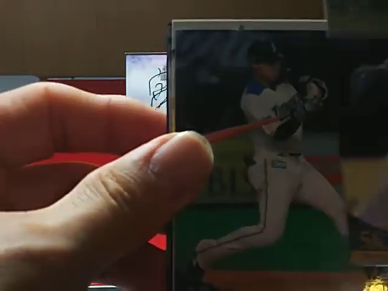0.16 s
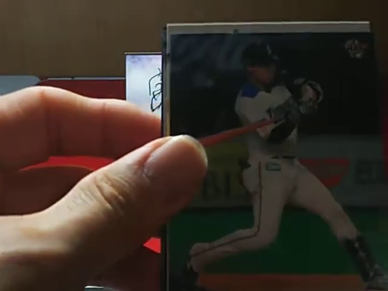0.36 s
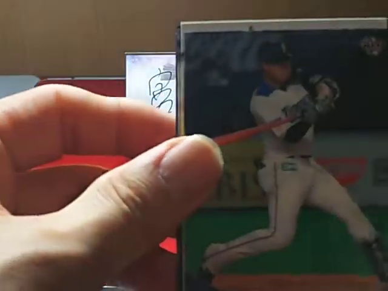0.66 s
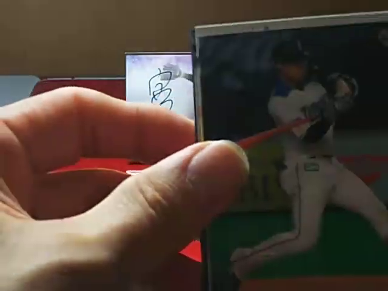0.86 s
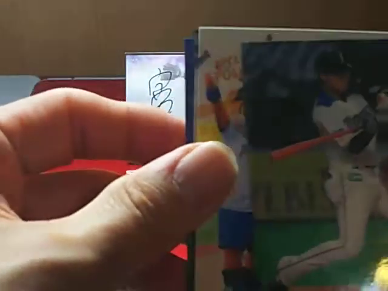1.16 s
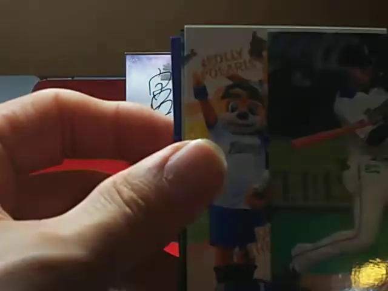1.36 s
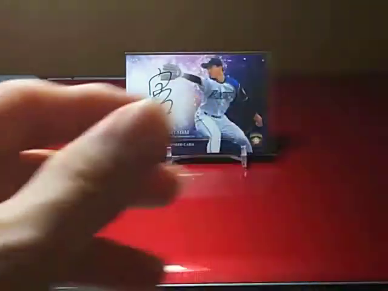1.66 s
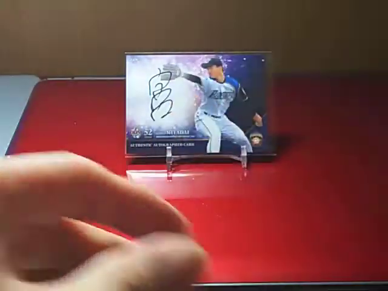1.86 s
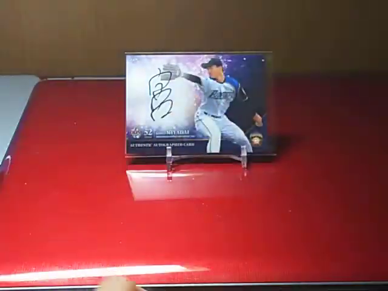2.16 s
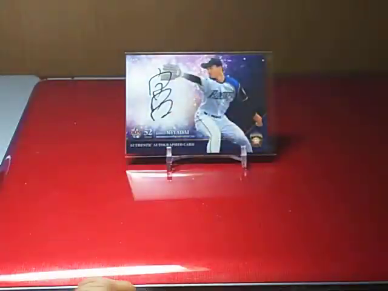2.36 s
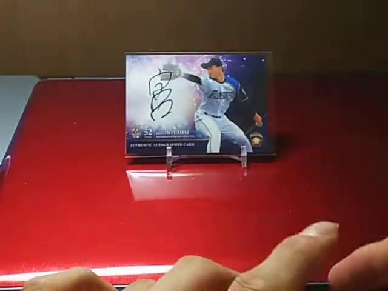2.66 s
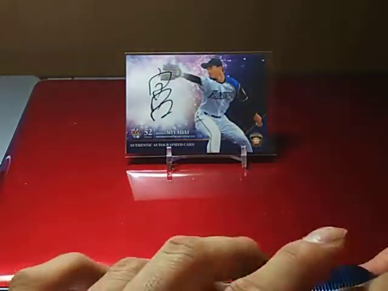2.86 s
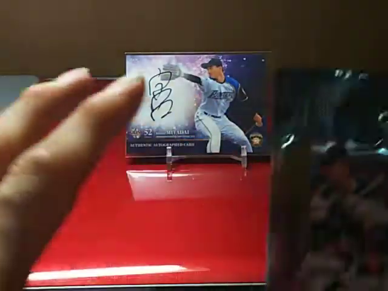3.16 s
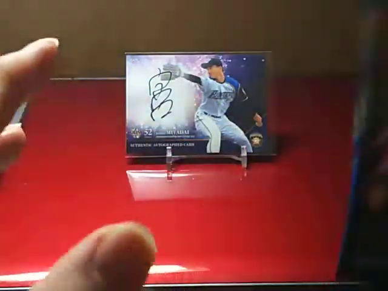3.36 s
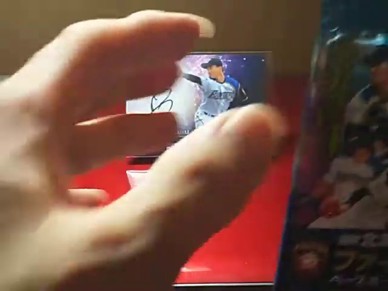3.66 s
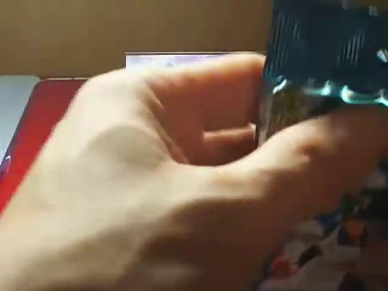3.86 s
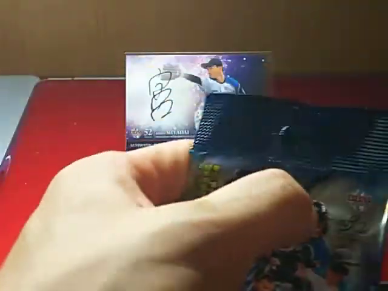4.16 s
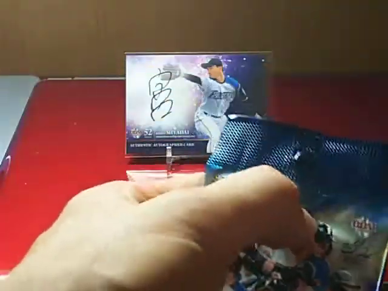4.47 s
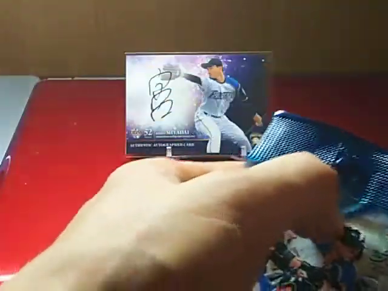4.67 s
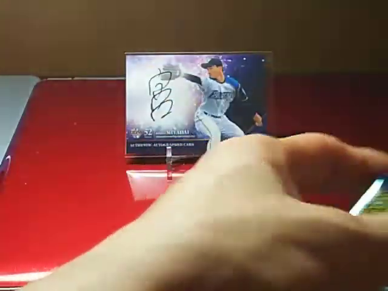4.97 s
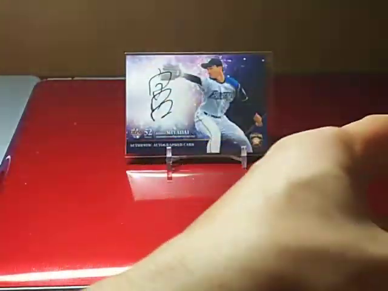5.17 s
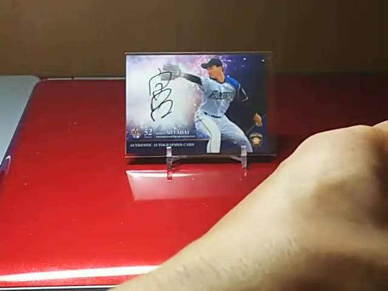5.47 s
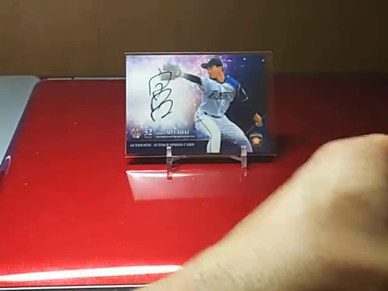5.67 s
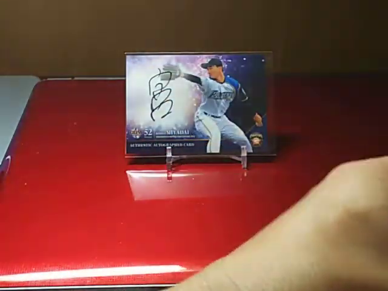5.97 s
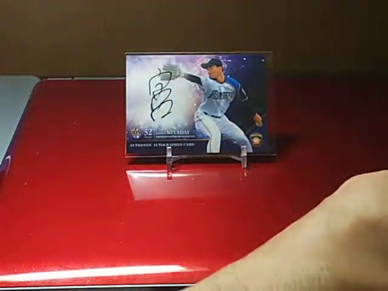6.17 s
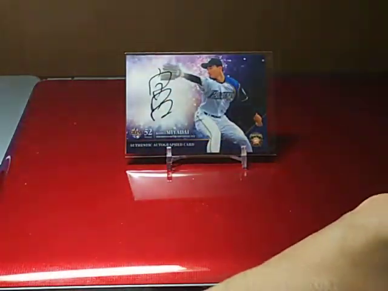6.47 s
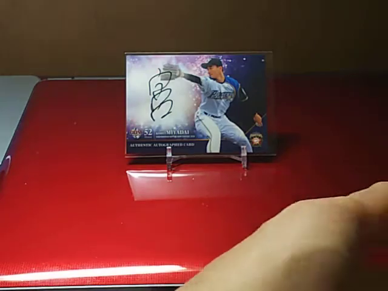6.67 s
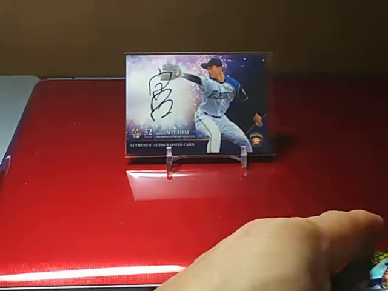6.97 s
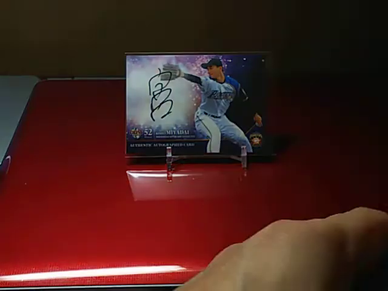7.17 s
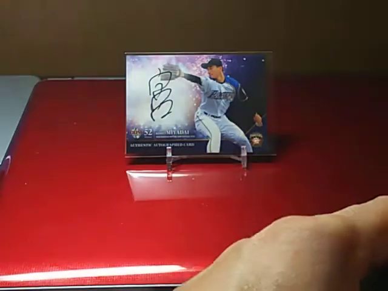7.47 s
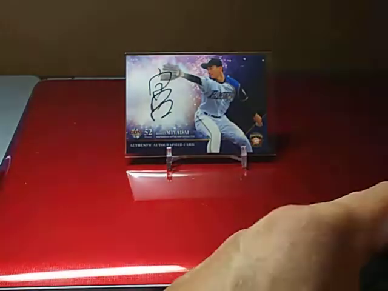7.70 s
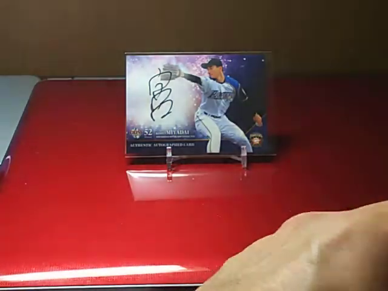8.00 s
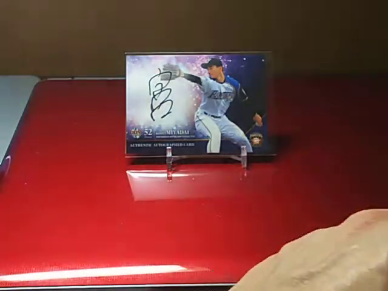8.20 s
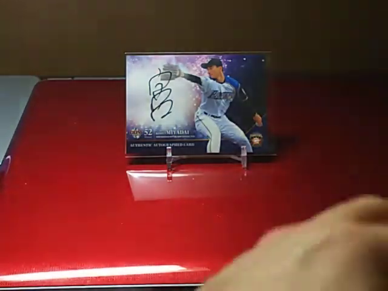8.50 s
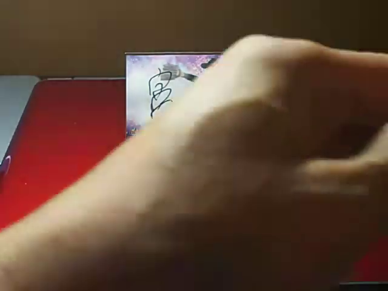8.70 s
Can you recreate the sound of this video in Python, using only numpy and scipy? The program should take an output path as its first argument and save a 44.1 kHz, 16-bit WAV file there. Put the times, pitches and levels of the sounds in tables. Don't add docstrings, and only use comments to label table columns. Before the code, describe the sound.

Cards shift faintly in a quiet humming room, then a foil pack crackles, is pried at and ripped open with sharp close snaps and table knocks.

```python
import sys
import numpy as np
from scipy import signal
from scipy.fft import rfft, irfft, next_fast_len
from scipy.io import wavfile
from scipy.ndimage import uniform_filter1d, minimum_filter1d

SR = 44100
rng = np.random.default_rng(int(sys.argv[2]) if len(sys.argv) > 2 else 0)


def amp(db):
    return 10 ** (np.asarray(db, float) / 20)


def write(x):
    x = np.atleast_2d(x).T
    wavfile.write(sys.argv[1], SR, np.round(np.clip(x, -1, 1) * 32767).astype(np.int16))


N = 389868

# (frequency [Hz], level [dB per Hz])
AIR_COLOUR = [(15, -42.5), (25, -27.5), (47, -9), (91, -6.5), (123, -7), (146, -15), (308, -18), (436, -22),
              (532, -20.5), (649, -27), (1840, -27), (2030, -27), (9500, -37), (12400, -108), (20900, -120)]
# (frequency [Hz], likeness [0 to 1])
AIR_LIKENESS = [(60, 0.99), (170, 0.92), (460, 0.59), (1280, 0.087), (3540, 0.0081), (9800, 0.02)]
# (frequency [Hz], width [Hz], level [dB], left-right [dB])
HUM_LINES = [(62, 7.2, -64, -3), (95, 4.1, -77, 0.5), (122.7, 7.9, -61.5, -0.5), (356.2, 22, -71, 0.5),
             (527.2, 14, -70, -5.5)]
# (start [s], end [s], level at start [dB], level at end [dB])
RUSTLE_STROKES = [(0.0, 0.075, -59.5, -59.5), (0.1, 0.301, -72.5, -71), (0.32, 0.351, -63.5, -66.5),
                  (0.857, 0.903, -67.5, -67), (1.507, 1.538, -58.5, -72.5), (1.88, 2.068, -72, -56),
                  (2.068, 2.102, -57.5, -62), (2.211, 2.287, -58, -56), (2.342, 2.447, -54, -57),
                  (2.464, 2.47, -43, -35.5), (2.593, 2.657, -53.5, -52.5), (2.806, 2.843, -31.5, -39.5),
                  (2.954, 3.012, -34, -35), (3.226, 3.275, -53.5, -48.5), (3.296, 3.392, -55, -48),
                  (3.963, 3.981, -44, -50), (4.222, 4.296, -59, -47), (4.399, 4.487, -43, -61.5),
                  (4.632, 4.674, -26.5, -36.5), (4.925, 4.967, -49, -52), (5.167, 5.402, -47, -61),
                  (5.494, 5.577, -53.5, -32), (5.571, 5.589, -25, -38), (5.69, 5.768, -51, -34),
                   (5.823, 5.884, -31.5, -34.5), (6.007, 6.097, -41.5, -44), (6.135, 6.205, -46, -41),
                   (6.34, 6.437, -51.5, -36), (6.571, 6.674, -60.5, -54), (6.814, 6.904, -61, -57),
                   (6.944, 7.007, -31, -35.5), (7.022, 7.054, -53, -44), (7.389, 7.458, -44, -30),
                   (7.584, 7.597, -39, -35.5), (7.621, 7.686, -25, -23.5), (7.846, 7.955, -36, -35.5),
                   (8.075, 8.199, -44, -40), (8.235, 8.294, -49.5, -38), (8.297, 8.379, -37.5, -43),
                   (8.392, 8.466, -43, -56), (8.561, 8.636, -49.5, -60)]
# (start [s], length [s], level [dB], pitch [Hz])
CARD_SQUEAK = (0.04, 0.03, -64, 1085)
# (start [s], length [s], level [dB], pitch [Hz])
HELD_RINGS = [(0.298, 0.0049, -52, 418), (0.348, 0.004, -61, 920), (2.8005, 0.003, -26, 1250),
              (2.951, 0.0036, -36.5, 930), (4.408, 0.006, -47, 444), (4.423, 0.005, -53, 470),
              (4.471, 0.0063, -43.5, 330), (6.899, 0.023, -31.5, 228.6), (6.925, 0.025, -44.5, 420),
              (6.906, 0.024, -34, 323), (6.956, 0.03, -31, 476), (6.976, 0.023, -39, 315),
              (6.975, 0.023, -40, 137), (7.655, 0.022, -38, 325), (6.06, 0.025, -49, 1740)]
# (time [s], peak level [dB], quarter of the hand's damping time to fall 60 dB [s],
# favoured pitch [Hz])
TABLE_KNOCKS = [(0.323, -43.5, 0.087, 223), (0.718, -42, 0.065, 102), (2.049, -37.5, 0.063, 158),
                (2.799, -33.5, 0.043, 774), (2.951, -23.5, 0.01, 714), (4.407, -31.5, 0.033, 228),
                (4.43, -30, 0.021, 127), (4.47, -38, 0.092, 290), (4.483, -34, 0.1, 256),
                (4.631, -30, 0.22, 646), (4.637, -32, 0.2, 239), (5.844, -37.5, 0.075, 204),
                (6.443, -35, 0.011, 200), (5.57, -37.5, 0.11, 473), (5.832, -39, 0.034, 800),
                (6.429, -31, 0.06, 750), (6.899, -29.5, 0.026, 450), (6.905, -33.5, 0.04, 720),
                (4.449, -50.5, 0.015, 444), (6.913, -23, 0.088, 246), (6.955, -28, 0.065, 251),
                (6.974, -31.5, 0.09, 460), (7.033, -31, 0.06, 247), (7.43, -31, 0.027, 118),
                (7.646, -43, 0.023, 345), (7.66, -33.5, 0.24, 350), (7.884, -28, 0.0077, 501),
                (7.908, -29.5, 0.03, 493), (8.134, -28.5, 0.013, 700)]
# (frequency [Hz], width [Hz], level [dB])
TABLE_MODES = [(144, 47, -2), (235, 18, -4.5), (312, 50, 1), (464, 27, -4), (736, 43, -6.5),
               (948, 30, -0.5)]
# (time [s], level [dB])
SMALL_TICKS = [(0.326, -38), (0.748, -52.5), (2.227, -44), (2.373, -43), (2.446, -28), (2.619, -38),
               (2.787, -43), (2.942, -26), (3.045, -39.5), (3.096, -39), (3.18, -38.5), (3.795, -38),
               (3.913, -43.5), (3.93, -38), (4.243, -49), (4.258, -40), (4.404, -31.5), (4.471, -38),
               (4.837, -41), (4.89, -44), (5.857, -24), (6.068, -38), (6.079, -27.5), (6.298, -32),
               (6.363, -32), (7.392, -40), (7.511, -39), (8.229, -54), (8.573, -33.5), (8.581, -38)]
# (time [s], level [dB], body re level [dB], edge
# re level [dB])
BIG_CREASES = [(0.724, -44, 0, -4), (2.053, -22, -14, -20), (2.239, -25, -25, -15),
               (2.264, -30, -21.5, -8), (2.394, -32, -24, -10.5), (2.419, -10, -50, -11.5),
               (2.431, -9, -44, -10), (2.519, -19, -19, -9.5), (2.664, -26.5, -18, -9),
               (2.728, -23, -12.5, -11.5), (2.802, -28.5, 4.5, -2.5), (2.829, -33, 2, -6),
               (2.952, -24, 1, -4), (2.986, -17, -36, -8), (2.995, -14.5, -27, -13),
               (3.035, -18, -28, -15), (3.209, -29, -20.5, 2.5), (3.259, -26, -24, -5.5),
               (3.349, -33.5, -20, 4.5), (3.544, -19, -13, -10.5), (3.918, -18, -14, -8.5),
               (3.966, -24, -20, -13), (4.0165, -17, -15, -11), (4.079, -30.5, -19.5, -24),
               (4.288, -28.5, -6.5, 1.5), (4.439, -32.5, -13.5, -27), (4.583, -37, -23, 4),
               (4.631, -24, 0, -10), (4.899, -17, -16, -12.5), (5.064, -39, -3, -4.5),
               (5.514, -48, -25, 8), (5.561, -22, -19, -40), (5.571, -17, -17.5, -19),
               (5.576, -11, -23, -24), (5.702, -34, -1, -11), (5.752, -28, -26, -8), (5.822, -19, -19, -28),
               (5.83, -20, -19, -25), (5.841, -16, -8, -6), (6.01, -47, 5.5, -28), (6.107, -38.5, -3.5, -1),
               (6.152, -25, -18.5, -10), (6.172, -28, 0, -4.5), (6.238, -27.5, -23, 0.5),
               (6.291, -30.5, -4, -10), (6.376, -30, -10, -15), (6.429, -25.5, -8, -20),
               (6.441, -21, -18.5, -4.5), (6.455, -12, -26, -12), (6.539, -22, -26, -17),
               (6.713, -17.5, -28, -1), (6.722, -32, -22, -2), (6.901, -27, -7, -13.5),
               (6.95, -17, -34, -36), (6.962, -29.5, 0, -57.5), (7.037, -36.5, -7, -6),
               (7.2, -18.5, -17, -6), (7.408, -27, -16, -9.5), (7.418, -27, -6, 2),
                (7.432, -13.5, -13, -10), (7.457, -20, -9.5, -5), (7.578, -28, -24, -2.5),
                (7.619, -19, -25, -0.5), (7.642, -14.5, -18.5, -4), (7.66, -5, -27.5, -13),
                (7.843, -16, -21.5, -39), (7.851, -28.5, -10, -18.5), (7.861, -20.5, -36, -13),
                (7.871, -12, -36, -14.5), (7.885, -4, -16.5, -6.5), (7.909, -8, -24, -11),
                (7.927, -20.5, -27, -41), (7.943, -23, -14, -1), (8.138, -18, -23, -23),
                (8.168, -10.5, -17, -23), (8.21, -14.5, -20, -12.5), (8.294, -19, -14.5, -10.5),
                (8.33, -30, -24.5, -18.5)]
# (time [s], level [dB])
CRACKLE_CREASES = [(2.528, -39), (5.522, -41), (5.72, -37), (5.748, -24), (5.759, -31), (5.834, -29),
                   (5.868, -27.5), (6.162, -35), (6.175, -28), (6.198, -33.5), (6.246, -42), (6.434, -31),
                   (6.911, -37), (6.967, -18), (6.973, -24.5), (6.991, -26.5), (7.21, -32), (7.428, -24.5),
                   (7.442, -24.5), (7.587, -38), (7.636, -24), (7.647, -14), (7.671, -15.5), (7.71, -35.5),
                   (7.837, -27.5), (7.889, -16), (7.907, -18), (7.917, -22.5), (7.923, -25), (7.936, -22),
                   (8.135, -20.5), (8.143, -29.5), (8.15, -33), (8.161, -26.5), (8.291, -23.5),
                   (8.297, -26), (8.317, -38), (8.348, -33), (8.364, -40), (0.742, -36), (2.062, -44.5),
                   (3.913, -40), (4.594, -43), (5.036, -48), (5.375, -47.5), (5.551, -41), (5.595, -35.5),
                   (5.735, -45), (5.778, -40), (5.786, -39), (6.18, -37.5), (6.37, -39), (6.917, -31.5),
                   (7.029, -43.5), (7.733, -43.5), (8.099, -44), (8.13, -33.5), (8.201, -37), (8.303, -34)]
# (time [s], level [dB], body re level [dB], edge re level [dB])
QUICK_FOLDS = [(2.513, -36, -20, -16), (2.787, -47, -25, 10), (2.809, -34, -12, -0.5),
               (3.006, -26, -22, -14), (3.957, -39, -20, -16), (4.283, -46, 5, -10), (5.583, -27, -21, -21),
               (5.758, -38, -8, 4.5), (6.068, -36, -14, -14), (6.153, -27, -22, -17), (6.416, -46, -14, 2),
               (6.962, -42, -9, 8), (6.985, -44, 5, -14), (7.037, -35, -14, -10), (7.417, -36, 4, -12),
               (7.628, -25, -7, -5), (7.632, -19, -17, -15), (7.651, -22, -18, -4), (7.667, -20, -24, -14),
               (7.734, -33, -20.5, -15.5), (7.849, -38, -6, 2), (7.873, -28, -0.5, -14),
               (7.909, -11.5, -16, -10), (8.135, -32.5, 2.5, -20), (8.161, -25, -24, -22),
               (7.644, -13, -7, -12), (6.442, -19, -24, -4), (5.833, -20, -26, -10), (7.2, -36, -30, 10),
               (3.919, -39, 0, 8)]
# (time [s], left-right [dB])
HAND_PLACES = [(0, -3.5), (2.3, -8.5), (2.8, -6), (3.6, -5.5), (4.3, -7.5), (5.5, -6.5), (6.1, -8),
               (6.9, -10.5), (7.3, -6.5), (7.64, -10), (7.9, -8), (8.8, -13.5)]
# (start [s], length [s], level [dB], pitch [Hz])
PANEL_POPS = [(2.429, 0.0037, -32.5, 2541), (2.727, 0.0046, -34.5, 2650), (2.802, 0.0037, -40.5, 388),
              (2.827, 0.004, -36.5, 1433), (2.982, 0.011, -38, 2890), (2.993, 0.0043, -35, 1590),
              (3.543, 0.0015, -33, 2106), (3.543, 0.0035, -35.5, 2794), (4.63, 0.0038, -42, 1920),
              (4.631, 0.0035, -27.5, 2676), (4.632, 0.0042, -39, 1406), (4.641, 0.021, -40.5, 1680),
              (4.643, 0.008, -29.5, 2553), (5.56, 0.004, -38, 2920), (5.56, 0.0034, -36.5, 1836),
              (5.571, 0.0046, -32, 1756), (5.838, 0.0048, -31, 1593), (5.86, 0.019, -40.5, 1666),
              (6.169, 0.003, -35.5, 2410), (6.169, 0.0042, -33.5, 1606), (6.171, 0.0033, -36, 1173),
              (6.29, 0.0044, -37.5, 1100), (6.425, 0.0051, -41.5, 820), (6.445, 0.0032, -38, 894),
              (6.903, 0.02, -38, 724), (7.432, 0.005, -38.5, 1663), (7.456, 0.003, -40, 2036),
              (7.639, 0.0067, -24.5, 2620), (7.641, 0.005, -25, 1653), (7.658, 0.0087, -37.5, 898),
              (7.87, 0.0049, -33, 2300), (7.885, 0.0033, -29.5, 572), (7.885, 0.0052, -25, 1924),
              (7.906, 0.0038, -27, 1673), (7.908, 0.004, -26, 2530), (7.912, 0.027, -45.5, 2760),
              (7.943, 0.0029, -43.5, 1100), (7.943, 0.0036, -36, 1783)]
# (start [s], length [s], level [dB], pitch [Hz])
SNAP_PINGS = [(6.4415, 0.00091, -19, 4300), (6.454, 0.002, -20, 3900), (7.432, 0.003, -23, 3800),
              (7.641, 0.006, -12, 3700), (7.643, 0.004, -14.5, 4250), (7.644, 0.0033, -16.5, 3000),
              (7.66, 0.003, -17, 3850), (7.907, 0.004, -12, 4150), (7.909, 0.002, -16, 3500),
              (8.137, 0.003, -22, 3900), (8.2095, 0.0018, -19, 3900)]
# (frequency [Hz], time to fall 60 dB [s])
WALL_DECAY = [(200, 0.16), (2000, 0.2), (10000, 0.15)]
# (frequency [Hz], gain [dB])
LEFT_PORT = [(300, -6), (1500, 2), (2600, 7.5), (3300, 6.5), (3900, 1.5), (4300, 7.5), (4900, 6), (7000, 2),
             (9500, -1.5), (10400, -20.5), (11500, -52.5)]
# (frequency [Hz], gain [dB])
RIGHT_PORT = [(300, -1), (1500, 8), (2400, 9.5), (3200, 16.5), (3800, 27), (4200, 23), (4900, 11),
              (7000, -3), (9000, -11.5), (10400, -29.5), (11500, -56)]
# (frequency [Hz], level [dB])
WEAKEST_KEPT = [(1000, -100), (3000, -88), (7500, -78), (8400, -61.5), (10000, -59), (11000, -47)]


def unit(x):
    return x / np.sqrt(np.mean(x ** 2) + 1e-20)


def along(points, hz):
    f, v = np.transpose(points)
    return np.interp(np.log(hz + 1), np.log(f + 1), v)


def filtered(x, response):
    m = 2 * next_fast_len(N // 2 + SR // 4)
    return irfft(rfft(x, m) * response(np.fft.rfftfreq(m, 1 / SR)), m)[..., :N]


def causal(points):
    def response(hz):
        cepstrum = irfft(np.log(amp(along(points, hz))))
        cepstrum[1:len(hz) - 1] *= 2
        cepstrum[len(hz):] = 0
        return np.exp(rfft(cepstrum))
    return response


def air():
    def mid_side_gain(hz):
        turn = np.arccos(np.clip(along(AIR_LIKENESS, hz), -1, 1)) / 2
        return amp(along(AIR_COLOUR, hz)) * [np.cos(turn), np.sin(turn)]

    def hum_gain(f):
        total = 0
        for hz, width, db, pan_db in HUM_LINES:
            sides = amp(db + np.array([[.5], [-.5]]) * pan_db)
            total = total + sides * np.exp(-((f - hz) / width) ** 2) * np.sqrt(SR / 2.5 / width)
        return total

    mid, side = filtered(rng.standard_normal((2, N)), mid_side_gain)
    hiss = amp(-57) * unit(np.array([mid + side, mid - side]))
    return hiss + filtered(rng.standard_normal(N), hum_gain)


def rustle():
    per_second, spread_db, shared = 280, 17, .5
    fade, grip = .0072, .004
    pack_s = 1.85
    t = np.arange(N) / SR
    stroke = np.zeros((3, 1, N))
    for start, end, from_db, to_db in RUSTLE_STROKES:
        body_db = -8 - .2 * ((from_db + to_db) / 2 + 41.5)
        body_db += 8.5 * (start < pack_s)
        now = slice(max(round((start - fade) * SR), 0), round((end + fade) * SR))
        edges = np.clip(np.minimum((t[now] - start) / grip, (end - t[now]) / fade) + 1, 0, 1)
        level = edges * amp(np.interp(t[now], [start, end], [from_db, to_db]) - 3)
        stroke[..., now] += level * amp([body_db + 14, 0, 3])[:, None, None]
    draw = rng.random((3, 1, N)) * SR / per_second
    sizes = (draw < 1) * amp(-spread_db * np.minimum(draw, 1))
    clumps = np.sqrt(np.abs(signal.filtfilt([1], [1, -.97], sizes ** 2)))
    both, own = rng.standard_normal((3, 1, N)), rng.standard_normal((3, 2, N))
    noise = shared * both + (1 - shared) * own
    idle = amp(np.where(t < pack_s, -72, -65))
    return noise * ((unit(clumps) + .45) * stroke + idle) * amp([[3], [-3]])


def foil(body, core, edge):
    def low(f, hz):
        return 1 / (1 + 1j * f / hz) ** 2

    def high(f, hz):
        return (1j * f / hz) ** 2 * low(f, hz)

    flap = filtered(body, lambda f: high(f, 450) * low(f, 2600) ** 2)
    snap = filtered(core, lambda f: high(f, 2540) * low(f, 6720))
    return flap + snap + filtered(edge, lambda f: high(f, 8270))


def panels(x, depth_db):
    z = signal.stft(x, nperseg=256)[2]
    field = uniform_filter1d(rng.standard_normal(z.shape[1:]), size=2, axis=0)
    field = uniform_filter1d(field, size=9, axis=1)
    gain = amp(depth_db * np.clip(unit(field), -2.5, 1.8) - 2.5)
    return signal.istft(z * gain, nperseg=256)[1][:, :N]


def squeak():
    s, length, db, hz = CARD_SQUEAK
    overtones = [(s, length, db, k * hz) for k in range(1, 5)]
    return rings(overtones, lift_db=4.5, rise=.0036, fall=.0092)


def rings(rows, lift_db, rise=.0014, fall=.0022):
    out, t = np.zeros(N + SR), np.arange(SR // 10) / SR
    for s, length, db, hz in rows:
        shape = (1 - np.exp(-t / rise)) * np.exp(-np.clip(t - length, 0, None) / fall - t / .04)
        out[round(s * SR):][:len(t)] += amp(db + lift_db) * shape * np.sin(2 * np.pi * hz * t)
    return out[:N]


def knocks():
    out, t = np.zeros(N + SR), np.arange(SR // 5) / SR
    hz, width, level = np.transpose(TABLE_MODES)[..., None]
    for s, db, t60, spot_hz in TABLE_KNOCKS:
        strength = level + 2 * rng.standard_normal(hz.shape) - 15 * np.abs(np.log2(hz / spot_hz))
        ring = np.sum(amp(strength - 21 * width * t) * np.sin(2 * np.pi * hz * t), axis=0)
        ring *= amp(-60 * t / np.clip(4 * t60, .02, 1))
        ring *= 1 - np.exp(-t / .00089)
        out[round(s * SR):][:len(t)] += amp(db) * ring / np.abs(ring).max()
    return out[:N]


def small(rows):
    return [(s, db, -15.5, -16.5) for s, db in rows]


def snaps(creases, rise=.0013, fall=.0019):
    shared, growth, pan_scatter_db = .6, .077, 1.5
    facing = .28
    parts, t = np.zeros((3, 2, N + SR)), np.arange(SR // 30) / SR - .01
    for s, db, body_db, edge_db in creases:
        both, own = rng.standard_normal((3, 1, len(t))), rng.standard_normal((3, 2, len(t)))
        pan_db = np.interp(s, *np.transpose(HAND_PLACES)) + facing * (edge_db + 11.5)
        pan_db += pan_scatter_db * rng.standard_normal()
        u = t / amp(growth * (db + 24.5))
        shape = np.where(u < 0, np.exp(-(u / rise) ** 2), np.exp(-np.abs(u) / fall))
        shape += 1.5 * np.exp(-np.abs(t) / .0003)
        own = own * [[[.4]], [[1]], [[1]]]
        burst = shape * (shared * both + (1 - shared) * own)
        burst[..., np.argmin(np.abs(t))] += 3.5
        burst /= np.linalg.norm(burst, axis=2, keepdims=True)
        part_gains = amp([db + body_db + 30, db + 12, db + edge_db + 27.5])[:, None]
        gains = part_gains * amp([.5 * pan_db + 8.5, -.5 * pan_db - 1])
        parts[..., round((s + t[0]) * SR):][..., :len(t)] += gains[..., None] * burst
    return parts[..., :N]


def pops_and_pings():
    pops = rings(PANEL_POPS, lift_db=4.5) * amp([[-1.5], [1.5]])
    return pops + rings(SNAP_PINGS, lift_db=3, fall=.0012) * amp([[-2.5], [2.5]])


def walls(x):
    hz, t, z = signal.stft(rng.standard_normal((2, SR // 2)), SR, nperseg=256)
    decay = amp(-60 * t / along(WALL_DECAY, hz)[:, None])
    tail = signal.istft(z * decay, SR, nperseg=256)[1]
    late = np.pad(x, ((0, 0), (300, 0)))
    return signal.fftconvolve(late, tail / np.linalg.norm(tail[0]), axes=1)[:, :N]


def ports(x):
    return np.array([filtered(x[0], causal(LEFT_PORT)), filtered(x[1], causal(RIGHT_PORT))])


def scene():
    creases = BIG_CREASES + small(SMALL_TICKS)
    crumpling = panels(foil(*snaps(creases)), depth_db=3)
    rubbing = panels(foil(*rustle()), depth_db=4.5)
    crackle = foil(*snaps(small(CRACKLE_CREASES), rise=.001, fall=.0015))
    pack = crumpling + rubbing + crackle
    table = filtered(knocks(), causal([(40, -21), (110, -2.5), (900, -.5)]))
    table = table + rings(HELD_RINGS, lift_db=7) + squeak()
    pops = pops_and_pings()
    echo = amp(-14.5) * walls(pack)
    room = amp(-21) * walls(pops) + air()
    folds = foil(*snaps(QUICK_FOLDS, rise=.0007, fall=.0012))
    return ports(pack + echo + folds) + pops + table + room


def memory_saving(x):
    jump_db = 6
    power = np.abs(uniform_filter1d(np.diff(x, prepend=0) ** 2, size=128)).sum(0) + 1e-12
    before = np.roll(uniform_filter1d(power, size=1024), 640)
    rises = power > amp(2 * jump_db) * before
    sudden = -minimum_filter1d(-1. * rises, size=2300, origin=-750)
    short = uniform_filter1d(sudden, size=256)
    quick = coarse(x, step_db=6, scatter_db=3.5, top_hz=10900, size=128, bins=2, frames=3)
    slow = coarse(x, step_db=6.5, scatter_db=4.5, top_hz=9800, size=1024, bins=16, frames=1)
    return short * quick + (1 - short) * slow


def coarse(x, step_db, scatter_db, top_hz, size, bins, frames):
    k = np.arange(size) + .5
    n = np.arange(2 * size) + .5
    window = np.sin(np.pi * n / (2 * size))[:, None]
    waves = np.cos(np.pi / size * np.outer(n + size / 2, k))
    basis = (window * waves * np.sqrt(2 / size)).astype("f4")
    blocks = np.pad(x, ((0, 0), (size, 2 * size - N % size))).reshape(2, -1, size).astype("f4")
    c = np.concatenate([blocks[:, :-1], blocks[:, 1:]], axis=2) @ basis
    power = uniform_filter1d(uniform_filter1d(c ** 2, bins, axis=2), frames, axis=1)
    near = np.sqrt(np.abs(power)) + 1e-9
    hz = k * SR / (2 * size)
    luck = np.repeat(rng.standard_normal((c.shape[1], size // bins)), bins, axis=1)
    step = near * amp(step_db + along([(400, -16), (1500, -.5)], hz) + scatter_db * luck)
    masker = amp(-25) * np.sqrt(np.mean(c[..., hz > 1000] ** 2, axis=2, keepdims=True))
    keep = (near > np.maximum(amp(along(WEAKEST_KEPT, hz)), masker)) & (hz < top_hz)
    rounded = np.sign(c) * np.floor(np.abs(c) / step + .4) * step * keep
    y = rounded @ basis.T
    return (y[:, :-1, size:] + y[:, 1:, :size]).reshape(2, -1)[:, :N]


def limited(x, top):
    need = np.minimum(1, top / (np.abs(x).max(axis=0) + 1e-9))
    return x * uniform_filter1d(minimum_filter1d(need, size=129), size=65)


def roll_off(x):
    return signal.sosfilt(signal.butter(12, 16000, fs=SR, output="sos"), x)


def record(dry):
    tamed = limited(memory_saving(dry), top=1.24)
    mix = np.clip(tamed, -1, 1)
    return roll_off(mix)


dry = scene()
out = record(dry)
write(out)
```